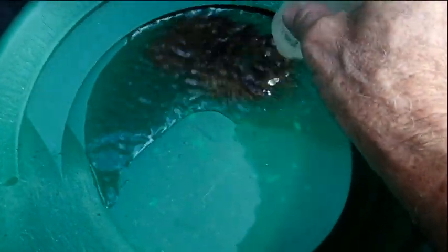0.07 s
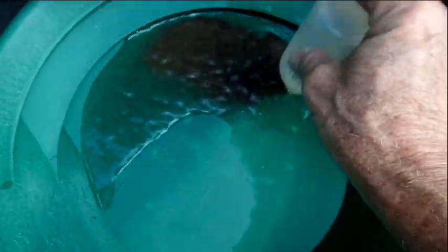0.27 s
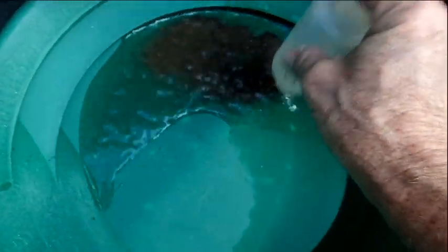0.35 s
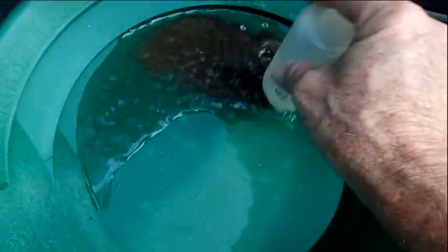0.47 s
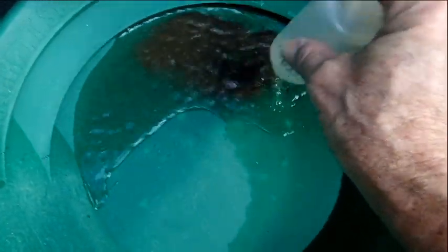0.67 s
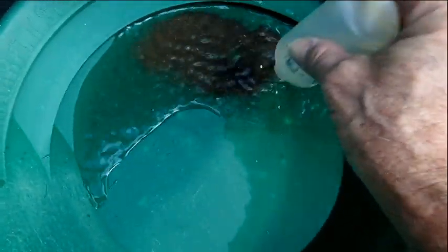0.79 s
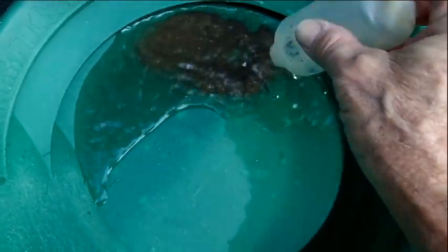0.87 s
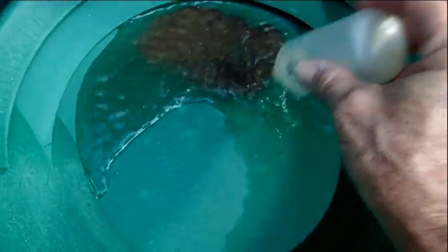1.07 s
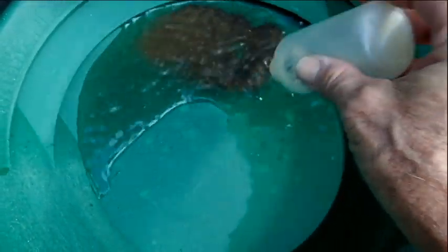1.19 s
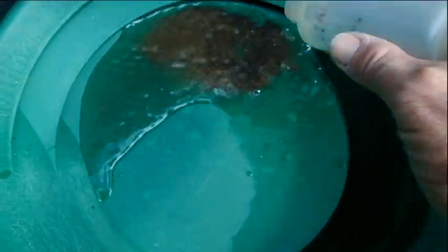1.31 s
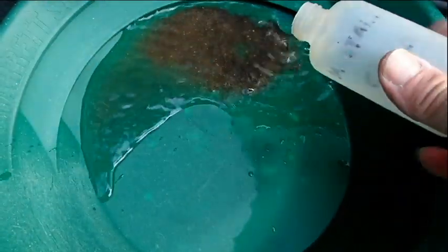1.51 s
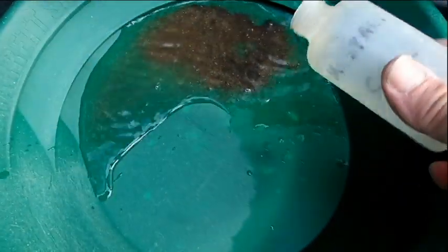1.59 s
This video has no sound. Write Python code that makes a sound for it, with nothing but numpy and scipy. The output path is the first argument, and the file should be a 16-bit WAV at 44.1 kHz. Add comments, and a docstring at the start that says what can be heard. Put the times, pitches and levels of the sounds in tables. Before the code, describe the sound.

Four quick, hollow plastic knocks sound close on the right as a squeeze bottle hits a pan holding water. The water gulps once, sloshes faintly and drips. Outdoors, a creek runs softly and light wind thumps on the left.

```python
"""Four plastic knocks sound close on the right, with a gulp of water after the third.
A suction bottle hits a plastic gold pan holding water: each blow cracks, rings the pan and stirs the water.
Big air bubbles make the gulps; tiny ones make the ticks of drips and spray.
A creek rushes behind, and light wind thumps on the left microphone."""
import sys
import numpy as np
from scipy import signal
from scipy.fft import rfft, irfft, next_fast_len
from scipy.io import wavfile
from scipy.ndimage import map_coordinates

SR = 44100
rng = np.random.default_rng(int(sys.argv[2]) if len(sys.argv) > 2 else 0)


def int16_out(signal):
    """Quantize to a 16-bit WAV file."""
    q = np.round(np.clip(np.atleast_2d(signal).T, -1, 1) * 32767)
    wavfile.write(sys.argv[1], SR, q.astype(np.int16))


N = 72765
TOP_HZ = 16090  # highest frequency kept

# Bottle blows: t/s, ring level/dB, brightness/dB, contact cut-off/Hz (higher is harder),
# main ring boost/dB, crack level/dB, sizzle level/dB, slosh level/dB
BLOWS = [(0.245, -1, -2.5, 2900, -0.5, -9, -31.5, -29), (0.3721, 1.5, -0.5, 9800, -0.2, -12, -27.5, -25),
         (.5282, .5, 8.5, 2350, -9, -20, -28, -27), (0.6482, 1.5, 14.5, 15800, 1, -0.5, -20, -23)]


def amp(db):
    """Turn decibels into a gain."""
    return 10 ** (np.asarray(db) / 20)


def unit(x):
    """Scale to an average strength (rms) of 1."""
    return x / np.sqrt(np.mean(x ** 2) + 1e-20)


def since(start):
    """Seconds since the start, zero before it."""
    return np.maximum(np.arange(N) / SR - start, 0)


def filtered(x, response):
    """Multiply each frequency in x by response(hz)."""
    size = next_fast_len(N + 8192)
    return irfft(rfft(x, size) * response(np.fft.rfftfreq(size, 1 / SR)), size)[..., :N]


def lowpass(x, hz, order):
    """Soften everything above hz."""
    return signal.sosfilt(signal.butter(order, min(hz, TOP_HZ), fs=SR, output='sos'), x)


def noise(spectrum):
    """Noise of strength 1, shaped by rows of f/Hz, level/dB."""
    freqs, db = np.transpose(spectrum)
    white = rng.standard_normal(N)
    return unit(filtered(white, lambda hz: amp(np.interp(np.log(hz + 1), np.log(freqs), db))))


def wobble(per_second):
    """A smooth curve through evenly spaced random points."""
    points = rng.standard_normal(int(N * per_second / SR) + 4)
    return map_coordinates(points, [np.arange(N) * per_second / SR])


def swell(t, rise, t60):
    """Rise quickly, then fade by 60 dB every t60 seconds."""
    return (1 - np.exp(-t / rise)) * amp(-60 * t / t60)


def creek():
    """Running water: a fine hiss on the left, a stronger steady rush on the right."""
    # Tone of the hiss: f/Hz, level/dB
    hiss = [(200, 6.5), (600, -20), (1000, 0), (1600, -6), (2600, -26.5), (4200, -30), (5500, -4.5),
            (9200, -2), (10500, -12.5), (15000, -15)]
    # Tone of the rush: f/Hz, level/dB
    rush = [(25, -39), (70, -2), (200, -4.5), (400, -3.5), (600, -12.5), (980, -1.5), (1500, -9.5),
            (2000, -15), (2600, -30.5), (3300, -32.5), (4600, -18.5), (6500, -16), (9200, -16),
            (10500, -29.5), (15000, -27)]
    return np.array([amp(-50) * noise(hiss), amp(-40.5 + 0.19 * wobble(10)) * noise(rush)])


def wind():
    """Wind rumbles unevenly, and single swirls of air each push once on the microphone."""
    # Tone of the rumble: f/Hz, level/dB
    rumble = [(10, -21), (28, -4.5), (55, 1), (120, -6), (200, -12.5), (300, -24.5), (600, -27),
              (2000, -73)]
    # Thumps from the swirls: t/s, f/Hz, level/dB
    thumps = [(0.2128, 133, -26), (0.348, 71.5, -22.5), (0.893, 60.3, -26), (1.392, 79, -26.5),
              (1.593, 268, -29.5), (1.6062, 157, -22), (1.6455, 171, -24)]
    out = amp(-37.5) * unit(noise(rumble) * amp(1.5 * wobble(14.7)))
    rasp = amp(-16) * noise([(200, 6), (1300, -1), (3000, -35)])
    for peak_s, hz, db in thumps:
        # One push with a dip on each side; a lower hz makes it wider.
        distance = (np.pi * hz * (np.arange(N) / SR - peak_s)) ** 2
        out += amp(db) * np.exp(-distance) * (1 - 2 * distance + rasp)
    return out


def drips():
    """Tiny bubbles ping, each with a splash of noise around its pitch."""
    # Drips and spray: t/s, f/Hz, level/dB
    drops = [(0.041, 5020, -36), (0.045, 12400, -36), (.064, 6400, -34), (.086, 5700, -35),
             (.262, 7730, -29), (0.27, 4540, -30.5), (.3445, 5800, -32), (.404, 6550, -34),
             (.418, 4240, -39), (.457, 3080, -39), (.4805, 4650, -32), (0.55, 4830, -34), (.569, 4650, -24),
             (0.597, 6240, -27.5), (.599, 13100, -36), (0.603, 5550, -35), (0.741, 8380, -33),
             (0.8239, 8840, -34.5), (1.119, 12600, -40), (1.519, 6600, -32), (1.5932, 5270, -30)]
    out = np.zeros(N)
    for start, hz, db in drops:
        t = since(start)
        ping = np.sin(2 * np.pi * hz * t)
        splash = noise([(hz / 2, -20), (hz, 0), (2 * hz, -15), (3 * hz, -28)])
        out += amp(db) * swell(t, rise=0.00066, t60=0.017) * (ping + 0.78 * splash)
    return out


def gulps():
    """Big air bubbles ring and rise in pitch as they come to the surface."""
    # Bubbles: t/s, start f/Hz, end f/Hz, level/dB, fade time t60/s
    bubbles = [(.549, 159, 309.5, -5, 0.093), (0.587, 338, 361.4, -19.5, 0.2), (0.689, 327, 348, -34, 0.41),
               (0.836, 322, 374, -37, 0.1)]
    glide_s = 0.01
    out = np.zeros(N)
    for start, start_hz, end_hz, db, t60 in bubbles:
        t = since(start)
        hz = end_hz + (start_hz - end_hz) * np.exp(-t / glide_s)
        phase = 2 * np.pi * np.cumsum(hz * (t > 0)) / SR
        out += amp(db) * swell(t, rise=0.0041, t60=t60) * np.sin(phase)
    return out


def stirred_water():
    """After each blow, the water gives a short, bright sizzle and a longer, low slosh."""
    # Tone of the sizzle: f/Hz, level/dB
    sizzle = [(1000, 6), (2200, 2), (3400, -4.5), (4600, 1), (8500, -5), (11000, -14), (16000, -23)]
    # Tone of the slosh: f/Hz, level/dB
    slosh = [(40, -20), (150, 2.5), (400, -5), (600, -17), (1100, -16), (2200, -32.5), (8000, -77)]
    sizzle_t60_s = 0.045
    out = np.zeros(N)
    for start, *_, sizzle_db, slosh_db in BLOWS:
        t = since(start)
        out += amp(sizzle_db - 60 * t / sizzle_t60_s) * (t > 0) * noise(sizzle)
        out += amp(slosh_db) * swell(t, rise=0.0043, t60=0.41) * noise(slosh)
    return out


def knocks():
    """The bottle hits with a crack and sets the pan ringing; a soft contact dulls both."""
    # The pan's natural tones: f/Hz, level/dB, fade time t60/s
    pan_tones = [(181.6, -25.5, 0.082), (340.8, -14, 0.09), (395, -8.5, 0.042), (474.4, -10.5, 0.071),
                 (538.5, -14, 0.066), (674, -14.5, 0.053), (751, -23, 0.09), (1005, -2, 0.033),
                 (1096, -22.5, 0.047), (1537, -27, 0.035), (1948, -17.5, .02), (2300, -20.5, 0.0093),
                 (2774, -22, 0.0098), (4486, -20.5, 0.0064)]
    # Tone of the crack: f/Hz, level/dB
    crack = [(800, 7), (2600, -7), (3400, 4.5), (4500, 12.5), (8500, -0.5), (11000, -12.5), (16000, -17)]
    ring_hz, ring_octaves = 980, 0.44  # centre and width of the main ring
    bright_above_hz, crack_t60_s = 1830, 0.0024
    out = np.zeros(N)
    for start, db, bright_db, contact_hz, ring_db, crack_db, *_ in BLOWS:
        t = since(start)
        blow = amp(crack_db - 60 * t / crack_t60_s) * (t > 0) * noise(crack)
        for k, (hz, tone_db, t60) in enumerate(pan_tones):
            treble_db = bright_db / (1 + (bright_above_hz / hz) ** 4)
            boost_db = ring_db * np.exp(-(np.log2(hz / ring_hz) / ring_octaves) ** 2)
            fade = amp(db + tone_db + treble_db + boost_db - 60 * t / t60)
            direction = (-1) ** (k + 1)  # neighbouring tones start opposite ways
            blow += direction * fade * np.sin(2 * np.pi * hz * t)
        out += lowpass(blow, contact_hz, order=6)
    return out


def scene():
    """The pan is loud on the right, dull and faint on the windy left; the creek is on both sides."""
    pan = knocks() + stirred_water() + gulps() + drips()
    far_db, dull_above_hz, leak_db = -16.5, 420, -44
    far_pan = filtered(pan, lambda hz: amp(far_db) / (1 + 1j * hz / dull_above_hz) + amp(leak_db))
    return np.array([far_pan + wind(), pan]) + creek()


def record(dry):
    """An automatic volume control dips after loud peaks; overloads clip and the top treble is cut."""
    limit_db, dip_s, recover_s = -5, 0.05, 0.076
    t = np.arange(N) / SR
    level_db = 20 * np.log10(np.abs(dry).max(0) + 1e-9)
    over_db = np.maximum(level_db - limit_db, 0)
    # Catch each peak over the limit, then let it fade.
    held_db = np.maximum.accumulate(over_db * np.exp(t / recover_s)) * np.exp(-t / recover_s)
    smoothing = np.exp(-1 / (dip_s * SR))
    dip_db = signal.lfilter([1 - smoothing], [1, -smoothing], held_db)
    clipped = np.clip(dry * amp(-dip_db), -1, 1)
    return filtered(clipped, lambda hz: hz < TOP_HZ)


dry = scene()
out = record(dry)
int16_out(out)
```